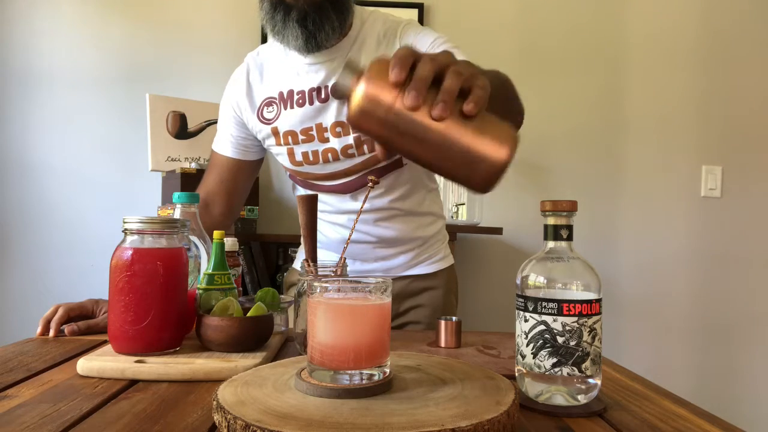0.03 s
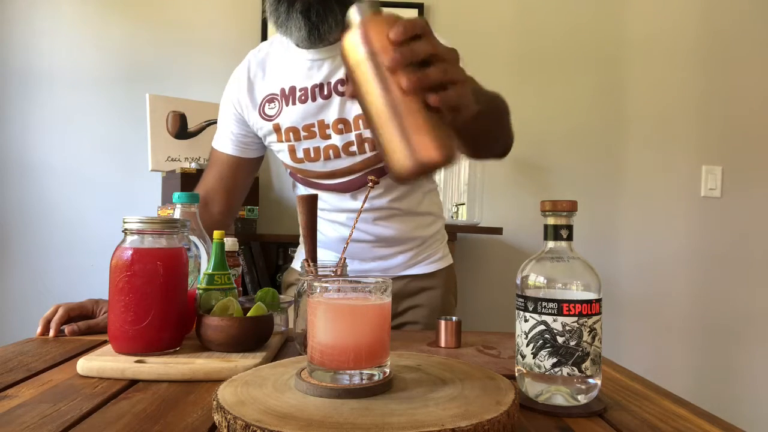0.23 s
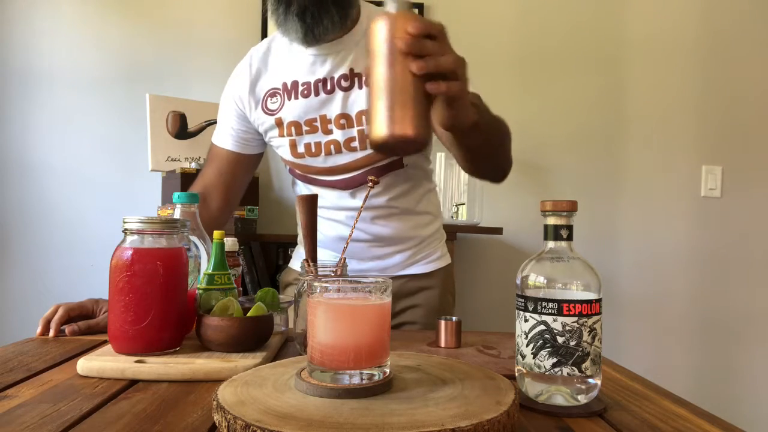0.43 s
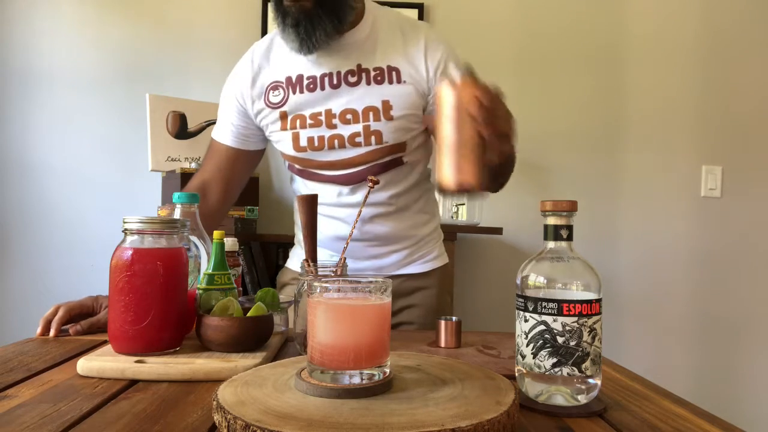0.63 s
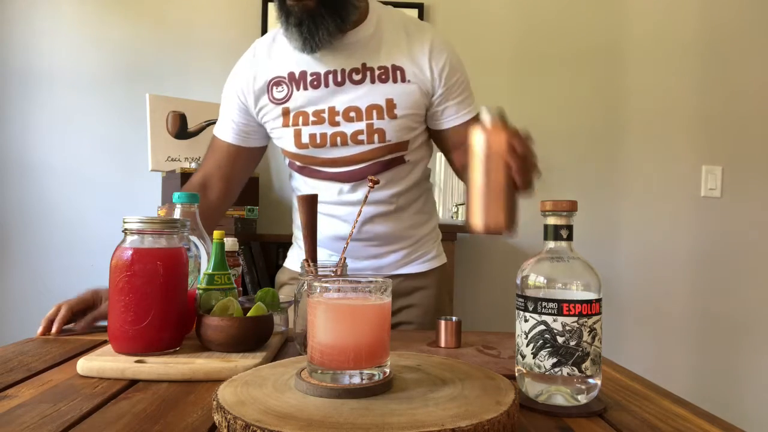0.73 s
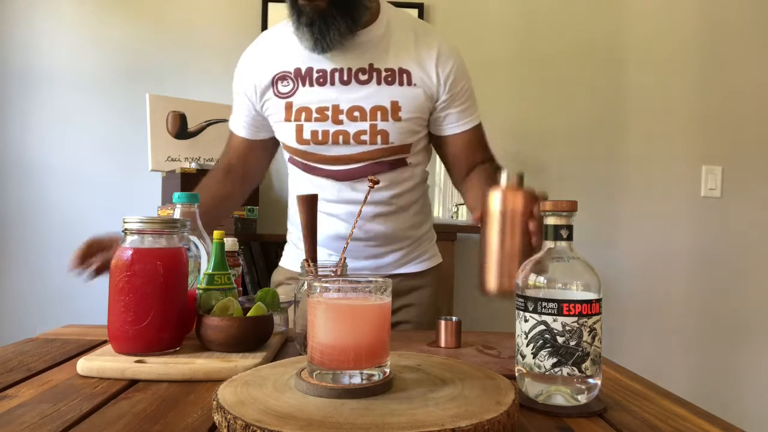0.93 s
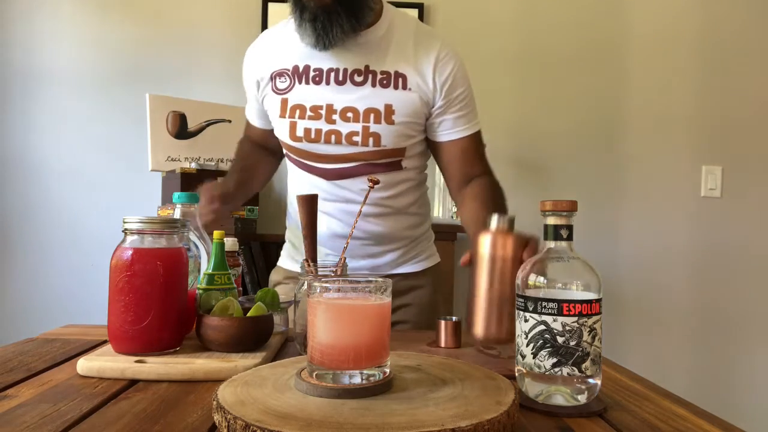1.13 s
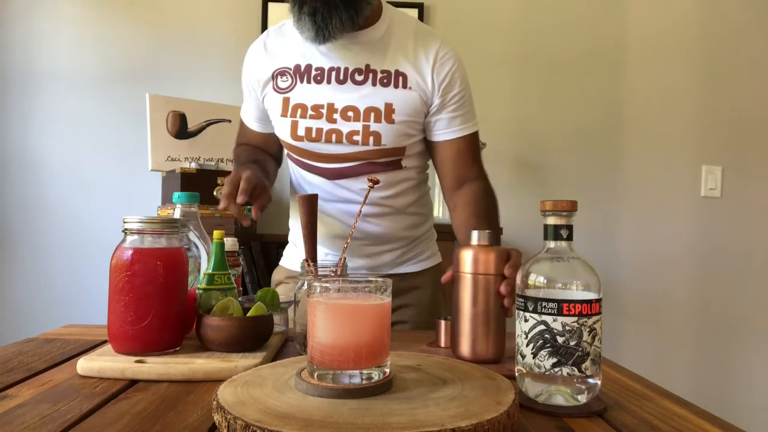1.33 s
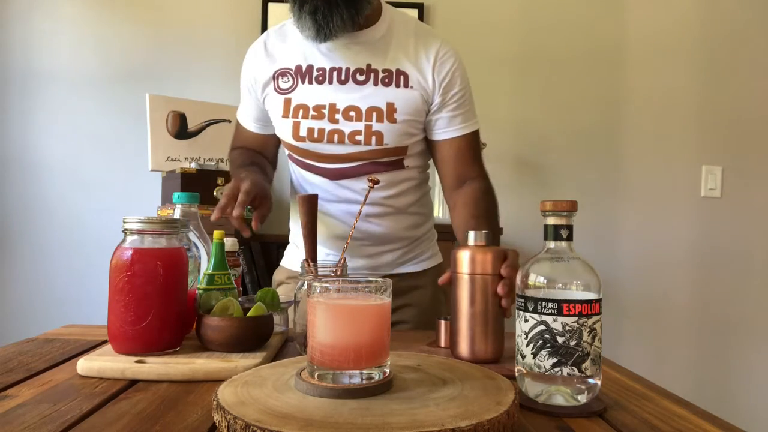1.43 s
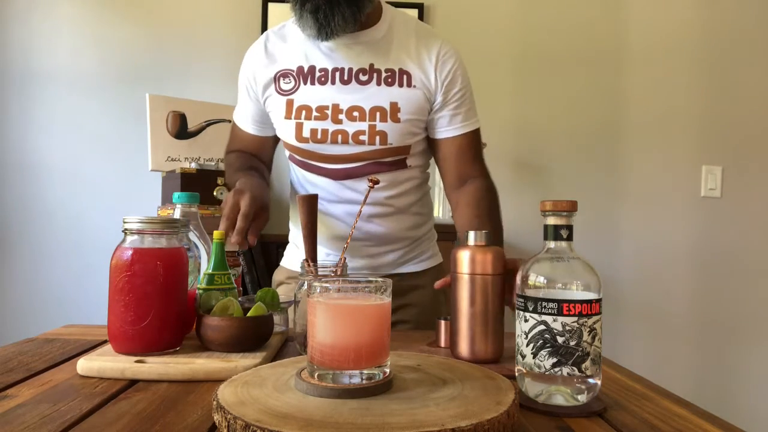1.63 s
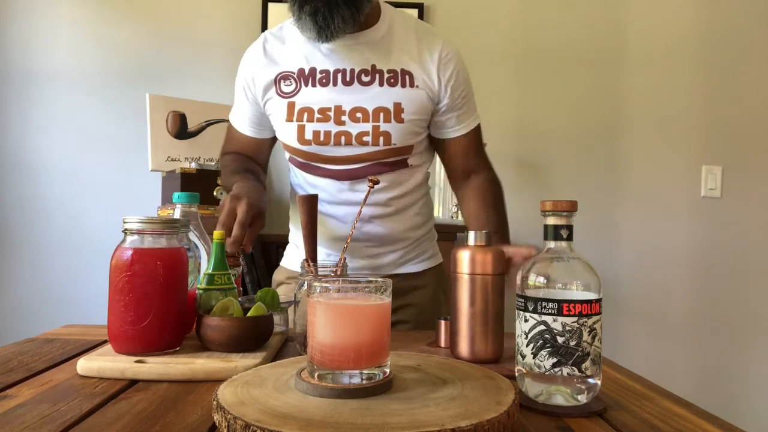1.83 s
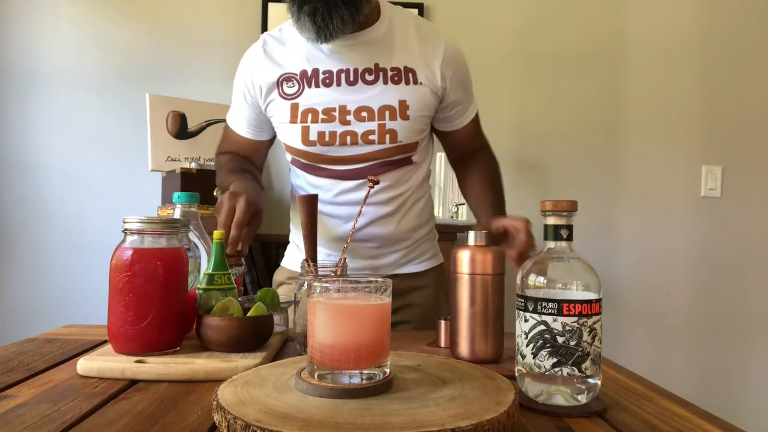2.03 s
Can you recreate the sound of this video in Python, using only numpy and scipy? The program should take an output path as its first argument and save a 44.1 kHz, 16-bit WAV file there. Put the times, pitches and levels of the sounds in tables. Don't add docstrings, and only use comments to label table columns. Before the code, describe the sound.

A metal cocktail shaker is tipped upright, ice ticking and one cube ringing the steel wall, then it is set down with a sharp wooden knock in a bare, echoing room, heard by a phone two metres away.

```python
import sys
import numpy as np
from scipy import signal
from scipy.fft import rfft, irfft
from scipy.io import wavfile

SR = 44100
rng = np.random.default_rng(int(sys.argv[2]) if len(sys.argv) > 2 else 0)


def elevation(decibels):
    levels = np.asarray(decibels, float)
    return 10 ** (levels / 20)


def master_out(mix):
    frames = np.transpose(np.atleast_2d(mix))
    ceiling = np.clip(frames, -1, 1)
    pcm = np.round(ceiling * 32767).astype(np.int16)
    wavfile.write(sys.argv[1], SR, pcm)


N = 91728
CRACK_T60 = 0.0027


def read(points, hz):
    f, value = np.transpose(points)
    return np.interp(np.log(hz + 1), np.log(f + 1), value)


def add(mix, s, sound):
    part = mix[round(s * SR):][:len(sound)]
    part += sound[:len(part)]


def coloured_noise(gain):
    spectrum = rfft(rng.standard_normal(N)) * gain(np.fft.rfftfreq(N, 1 / SR))
    y = irfft(spectrum, N)
    return y / np.sqrt(np.mean(y ** 2))


def pulse(gain):
    log_gain = np.log(gain(abs(np.fft.fftfreq(4096, 1 / SR))) + 1e-4)
    phase = -signal.hilbert(log_gain).imag
    return np.fft.ifft(np.exp(log_gain + 1j * phase)).real[:2048]


def blow(points):
    y = pulse(lambda f: elevation(read(points, f)))
    return y / np.linalg.norm(y)


def ring(modes, tilt_db=0., rise_cycles=0.):
    t = np.arange(SR) / SR
    out = np.zeros(SR)
    for hz, db, t60 in modes:
        decay = elevation(db + tilt_db * np.log2(hz / 2400) - 60 * t / t60)
        rise = 1 - np.exp(-t * hz / max(rise_cycles, .01))
        out += decay * np.sin(2 * np.pi * hz * t) * rise
    return out


def burst(gain, t60, rise_s=.0004):
    t = np.arange(2048) / SR
    puff = rng.standard_normal(2048) * elevation(-60 * t / t60) * np.minimum(t / rise_s, 1)
    y = signal.fftconvolve(puff, pulse(gain))[:2048]
    return y / abs(y).max()


def crack():
    def gain(f):
        ratio = f / 7250
        return ratio ** 3 / (1 + ratio ** 5.67)
    return burst(gain, CRACK_T60)


# (frequency [Hz], t60 [s])
ROOM_DECAY = [(100, .9), (400, 1.21), (1100, 1.22), (3000, 1.227), (7000, 1.022), (11000, 0.54),
              (16000, 0.43)]
# (frequency [Hz], level [dB])
ROOM_TONE = [(100, 0), (400, 2), (1200, 0), (3000, -2), (8000, -2), (16000, 1)]


def tail():
    gap_s = 0.0031
    hz, t, z = signal.stft(rng.standard_normal(N + 512), SR, nperseg=256)
    fade_db = read(ROOM_TONE, hz)[:, None] - 60 * t / read(ROOM_DECAY, hz)[:, None]
    y = signal.istft(z * elevation(fade_db), SR, nperseg=256)[1][:N]
    y = y * np.clip(np.arange(N) / SR / gap_s - 1, 0, 1)
    return y / np.linalg.norm(y)


# (time [s], level [dB])
ECHOES = [(.0035, -9), (.0055, -9), (.011, -23), (0.015, -9)]


def room(x, wet_db, echo_db=-5.6):
    h = elevation(wet_db) * tail()
    h[0] = 1
    for s, db in ECHOES:
        h[round(s * SR)] += elevation(db + echo_db)
    return signal.fftconvolve(x, h)[:N]


# (frequency [Hz], level [dB])
HISS_COLOUR = [(15, -37), (25, -6.5), (263, 0), (531, -7.5), (659, -8.5), (1230, -7.5), (1400, -26),
               (2350, -22.5), (16000, -39.5)]


def background():
    hiss_db, hum_db, hum_hz = -60, -66, 59.5
    earlier_db, earlier_fall = -59, 50
    t = np.arange(N) / SR

    def rattle_colour(f):
        ice_band = 1 / (1 + (2.7 * (f / 2200 - 2200 / (f + 1))) ** 2)
        cup_band = 4 / (1 + ((f - 200) / 45) ** 2)
        return ice_band + .03 + cup_band

    hiss = elevation(hiss_db) * coloured_noise(lambda f: elevation(read(HISS_COLOUR, f)))
    hum = elevation(hum_db) * np.sin(2 * np.pi * hum_hz * t)
    earlier = elevation(earlier_db - earlier_fall * t) * coloured_noise(rattle_colour)
    return hiss + hum + earlier


def plop():
    start_s, level_db = .9543, -38
    from_hz, to_hz, fall_s = 1350, 255, .0017
    t60, steady_part = .1, .35
    out, t = np.zeros(N), np.arange(4000) / SR
    fall = np.exp(-t / fall_s)
    hz = to_hz + (from_hz - to_hz) * fall
    loudness = elevation(level_db - 60 * t / t60) * (steady_part + (1 - steady_part) * fall)
    add(out, start_s, loudness * np.sin(2 * np.pi * np.cumsum(hz) / SR))
    return out


SCRAPE_HZ = [1290, 2850, 4440]


def scrape():
    start_s, end_s, level_db = 1.277, 1.294, -37.5
    t = np.arange(N) / SR
    grow = np.clip((t - start_s) / (end_s - start_s), 0, 1) * (t < end_s)
    rub = coloured_noise(lambda f: sum(1 / (1 + ((f - hz) / 250) ** 2) for hz in SCRAPE_HZ))
    return elevation(level_db) * grow * rub


# (frequency [Hz], level [dB], t60 [s])
CUP = [(257, -1.5, .16), (420, -4.5, .03), (1095, -10.5, 0.15), (1190, -0.5, 0.076)]


def cup_thump(rise_cycles):
    return ring(CUP, rise_cycles=rise_cycles)


# (time [s], level [dB], body frequency [Hz], crack level [dB], thump into the cup [dB])
ICE_TICKS = [(.001, -47, 1500, -24, 12), (.0205, -34, 2000, -22, -2), (.041, -51, 4500, -18, -2),
             (.082, -30, 3000, -18, -1), (.103, -44, 2200, -14, 5), (.130, -47, 2000, -16, 3),
             (.1405, -34, 2000, -22, -6), (.1638, -33, 2800, -26, -10), (.1868, -30, 2000, -24, -9),
             (.4078, -12, 3700, -14, -13), (.4082, -17, 1300, -26, -13), (.4105, -14, 2000, -18, -12),
             (.4275, -26, 5000, -18, -12), (.4915, -26, 1900, -34, -12), (.512, -35, 5500, -22, -12),
             (1.271, -44, 1800, -24, -10), (1.276, -46, 1800, -24, -10), (1.426, -45, 13000, -6, -20),
             (1.520, -21, 3600, -19, -14), (1.5205, -36, 13000, -6, -20), (1.56, -52, 13000, -6, -20),
             (1.645, -57, 13000, -6, -20), (1.860, -54, 12500, -8, -20), (1.868, -59, 12500, -8, -20)]


def ice():
    body_t60 = 0.011
    out, cup = np.zeros(N), cup_thump(0.98)
    for s, db, hz, crack_db, thump_db in ICE_TICKS:
        body = burst(lambda f: 1 / (1 + (f / hz - hz / (f + 1)) ** 2) ** 1.3, body_t60)
        add(out, s, elevation(db) * (body + elevation(crack_db) * crack()))
        add(out, s, elevation(db + thump_db - 13) * cup)
    return room(out, wet_db=-6.5, echo_db=-7)


STEEL_HZ = [2095, 2353, 2410, 3279, 3830, 3866, 4449, 5135, 6044, 8700, 9075, 10890, 11150, 12820]
# (level [dB], t60 [s])
STEEL_RING = [(-12, .03), (-1.5, 0.084), (0, 0.11), (-18, .03), (-10, 0.069), (-4, .06), (-3, 0.015),
              (-14.5, 0.058), (-17, 0.13), (-14.5, 0.054), (-8.5, 0.074), (-41, 0.055), (-15, .09),
              (-22.5, 0.057)]
# (frequency [Hz], level [dB])
SHIMMER = [(300, -21), (1100, -9), (2800, -8.5), (5200, 3.5), (9000, -7.5), (16000, -11)]
# (time [s], level [dB], brightness [dB per octave])
STRIKES = [
    (0.1918, -6, 0.65),
    (.204, -22, -4.5),
    (0.228, -14, -0.6),
    (.4078, -44, 9),
]


def steel():
    thump_db, snap_db, shimmer_db = -20, -1, -5
    out, hits = np.zeros(N), np.zeros(N)
    modes = [(hz, db, t60) for hz, (db, t60) in zip(STEEL_HZ, STEEL_RING)]
    shimmer = blow(SHIMMER)
    thump = elevation(thump_db) * cup_thump(.8)
    for s, db, tilt_db in STRIKES:
        add(out, s, elevation(db - 6.5) * (ring(modes, tilt_db, rise_cycles=0.52) + thump))
        add(out, s, elevation(db + snap_db) * crack())
        add(hits, s, elevation(db + shimmer_db) * shimmer)
    return room(out, wet_db=-4.5, echo_db=-1.5) + signal.fftconvolve(hits, tail())[:N]


# (frequency [Hz], level [dB], t60 [s])
TABLE = [(67.7, -34, 0.11), (126.2, -22, 0.18), (184, -19, .15), (275.3, -16, .35), (338, -15, 0.16),
         (436, -6, 0.06), (779, -7.5, 0.058), (931, -0.5, 0.017), (1345, 1.5, 0.014), (1526, 6.5, 0.012),
         (1728, 8.5, 0.012), (2100, 1, 0.016), (2953, -5.5, 0.014), (4500, -31, 0.023)]
# (frequency [Hz], level [dB])
KNOCK_COLOUR = [(59, -66), (100, -52), (721, -38), (1760, -13), (3190, -3), (4980, -3.5), (6020, -14.5),
                (16000, -36.5)]
# (frequency [Hz], level [dB])
SPREAD = [(35, -49), (60, -20.5), (233, -13.5), (274, -6), (380, -14), (1200, -9), (1380, -10.5),
          (4860, -19), (16000, -49.5)]


def knock():
    land_s = 1.2938
    wood_db, crack_db, spread_db = -5, -6.5, 9
    out, spread = np.zeros(N), np.zeros(N)
    add(out, land_s, elevation(wood_db) * ring(TABLE, rise_cycles=1.29))
    landing_crack = burst(lambda f: elevation(read(KNOCK_COLOUR, f)), t60=0.017)
    add(out, land_s, elevation(crack_db) * landing_crack)
    add(spread, land_s, elevation(spread_db) * blow(SPREAD))
    return room(out, wet_db=-7.5) + signal.fftconvolve(spread, tail())[:N]


def scene():
    mix = ice() + plop() + steel() + knock() + scrape() + background()
    return mix[None]


def band_limit(x):
    return signal.sosfilt(signal.butter(12, 17000, fs=SR, output="sos"), x)


def record(dry):
    low_cut = signal.butter(4, 50, "high", fs=SR, output="sos")
    high_cut = signal.cheby2(10, 40, 16600, fs=SR, output="sos")
    band = signal.sosfilt(high_cut, signal.sosfilt(low_cut, dry))
    return band_limit(band)


dry = scene()
out = record(dry)
master_out(out)
```